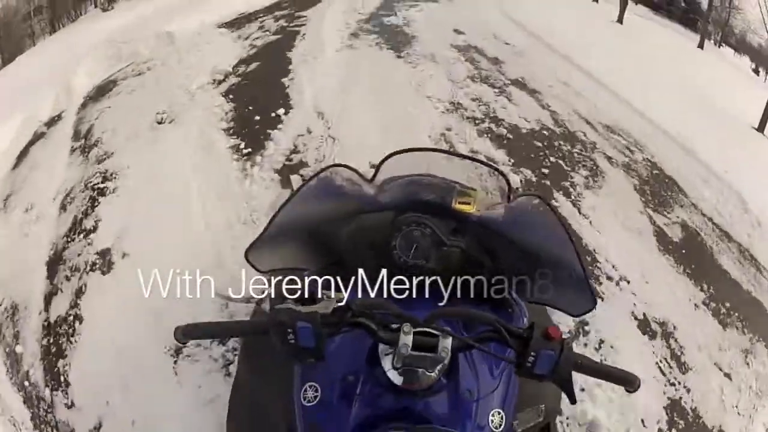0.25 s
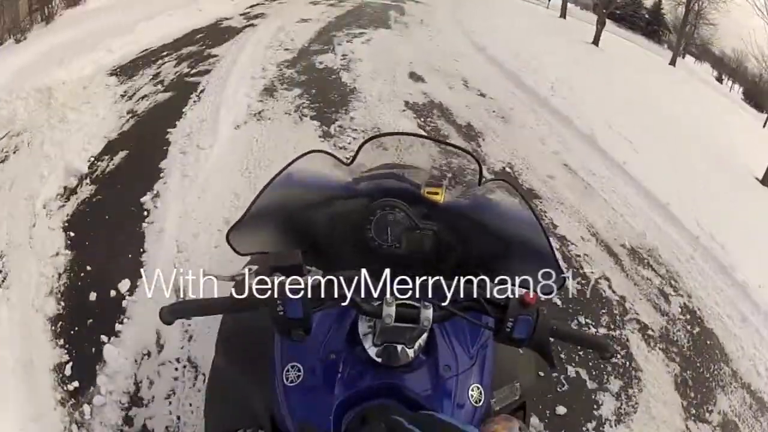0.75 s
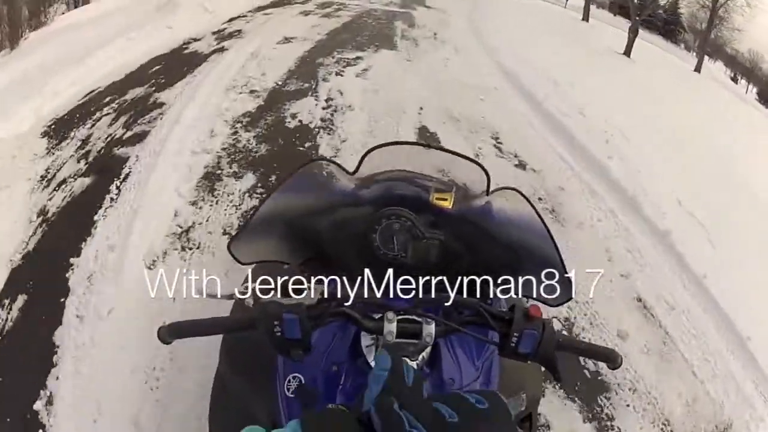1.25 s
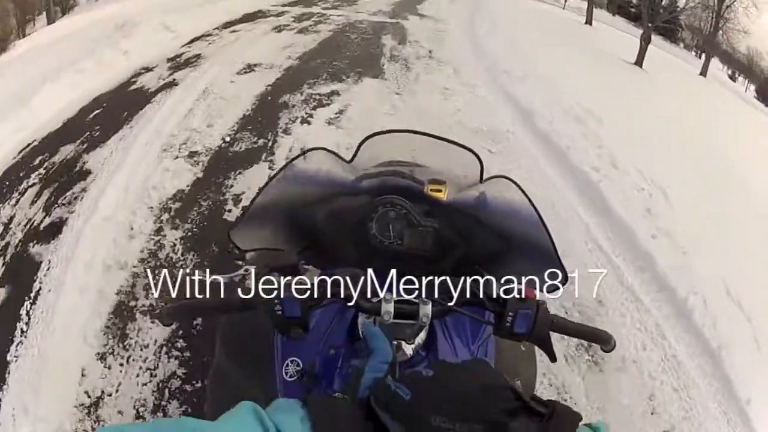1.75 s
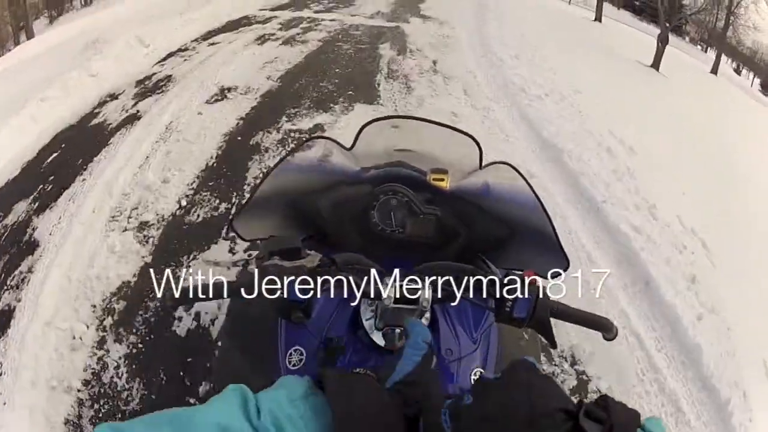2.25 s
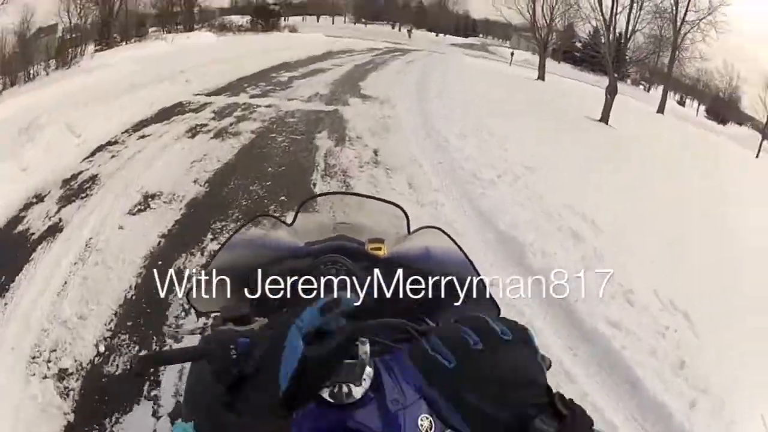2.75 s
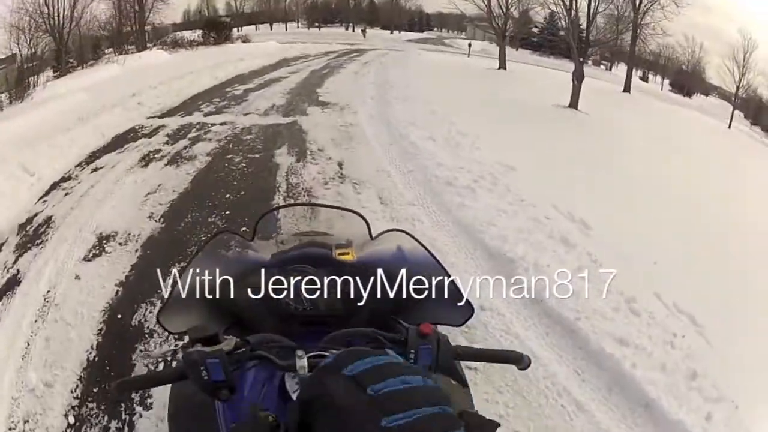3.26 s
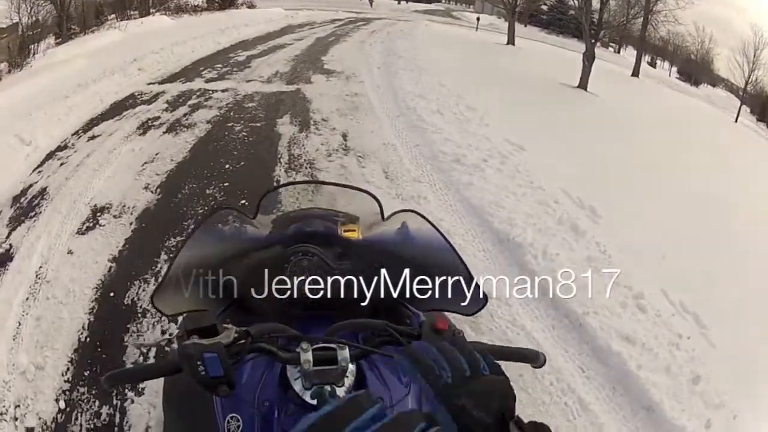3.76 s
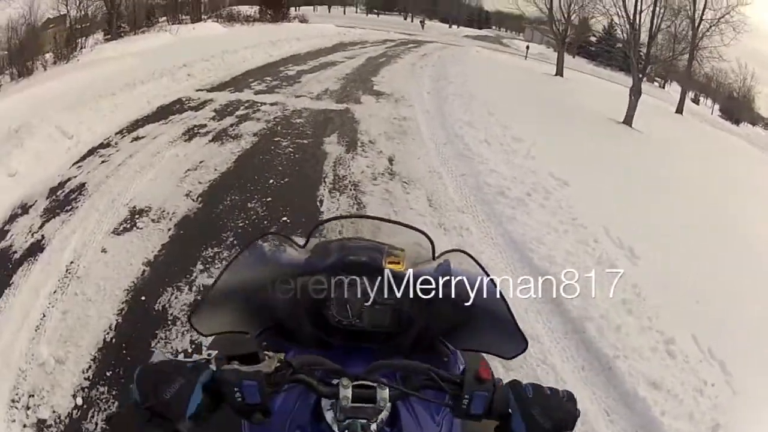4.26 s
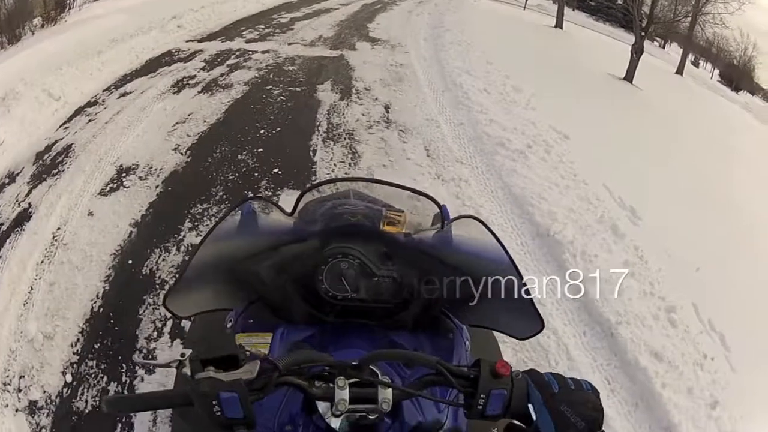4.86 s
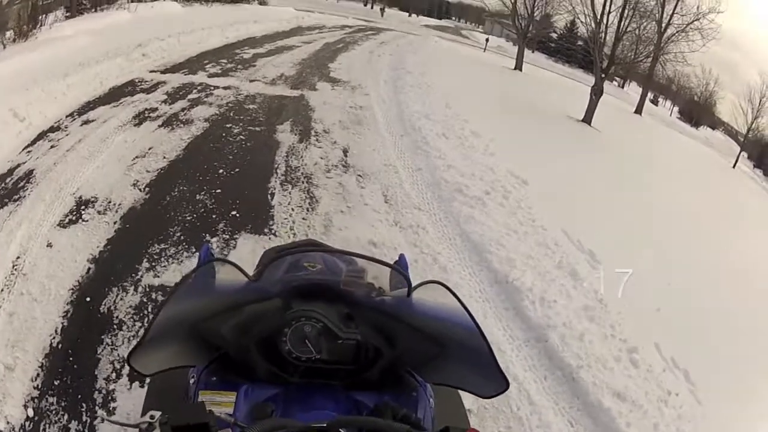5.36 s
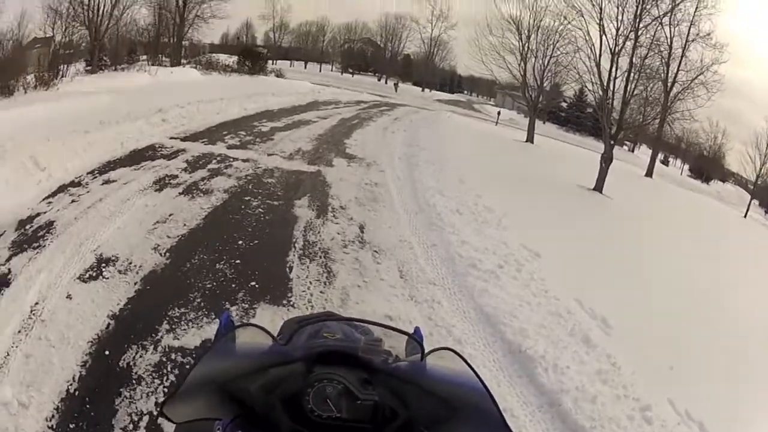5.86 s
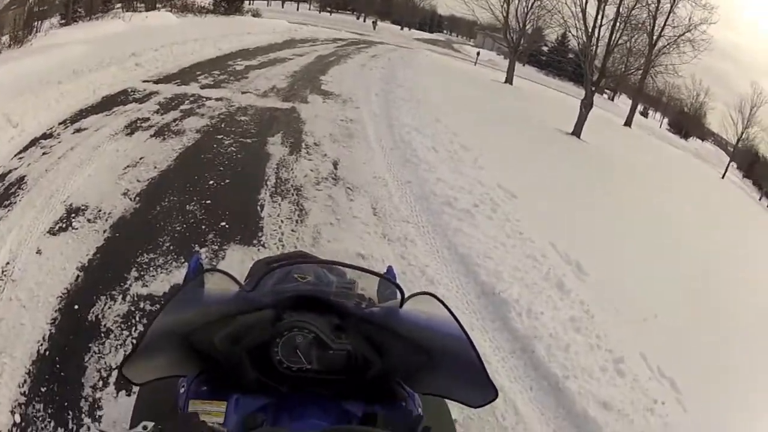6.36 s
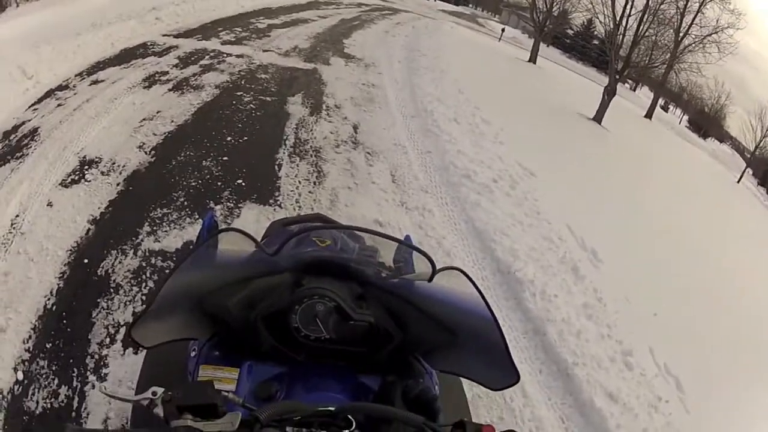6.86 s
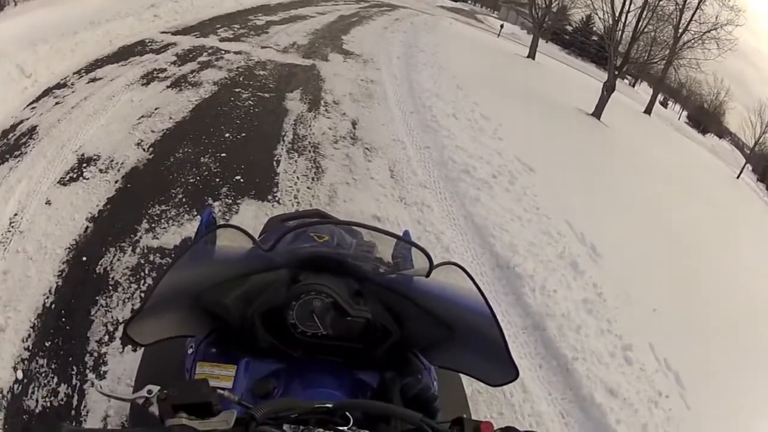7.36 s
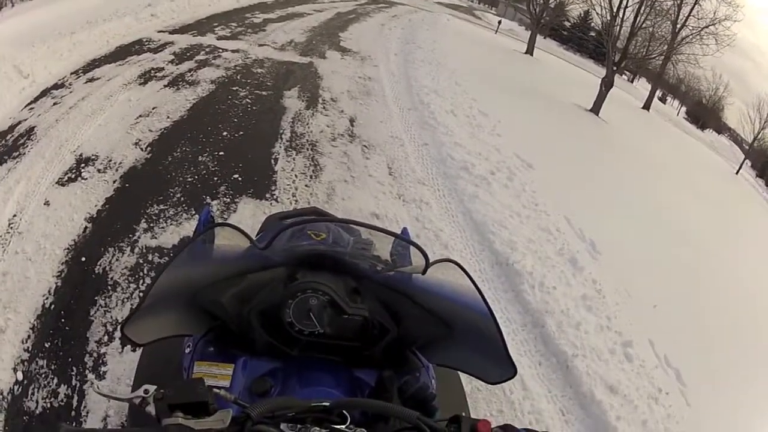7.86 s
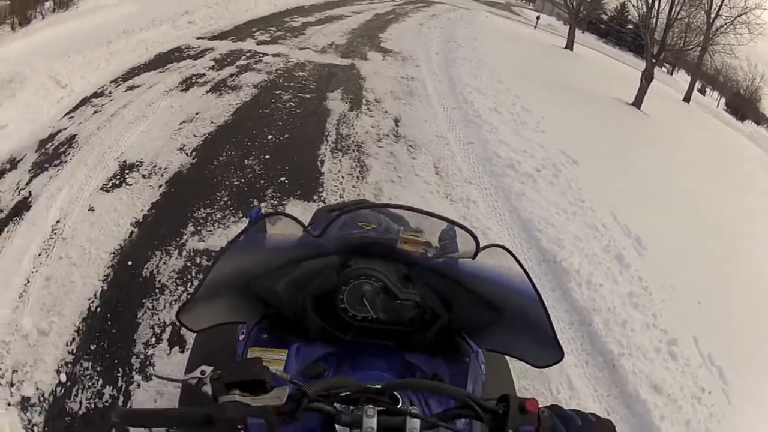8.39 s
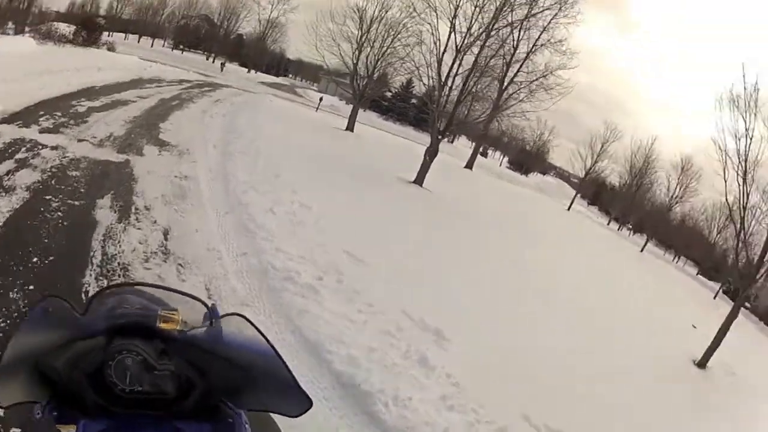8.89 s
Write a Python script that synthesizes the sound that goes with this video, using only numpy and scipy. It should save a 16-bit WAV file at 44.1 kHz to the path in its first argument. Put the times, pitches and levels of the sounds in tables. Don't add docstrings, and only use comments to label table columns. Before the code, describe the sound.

Muffled onboard snowmobile engine slows to a lumpy idle and dies; the starter whirs twice before the motor sputters alive and revs loudly.

```python
import sys
import numpy as np
from scipy import signal
from scipy.fft import rfft, irfft, next_fast_len
from scipy.io import wavfile
from scipy.ndimage import uniform_filter1d

SR = 44100
rng = np.random.default_rng(int(sys.argv[2]) if len(sys.argv) > 2 else 0)


def dump(signal):
    limited = np.clip(np.atleast_2d(signal).T, -1, 1)
    pcm = np.round(limited * 32767).astype(np.int16)
    wavfile.write(sys.argv[1], SR, pcm)


def amplitude_ratio(level_db):
    exponent = np.asarray(level_db, float) / 20
    return 10 ** exponent


N = 402633
TIME = np.arange(N) / SR
COAST_S, STALL_S, CATCH_S, FIRST_PULSE_S = 2.4, 4.0, 7.76, 7.6
FRAME_HZ = 72.05

# start_s, rate_hz
SPEED_HZ = [(0, 36), (1, 30), (1.5, 28.8), (2.5, 28.55), (2.8, 27.8), (4, 27.9), (7.55, 30), (7.72, 39),
            (7.76, 50.8), (7.83, 53.5), (7.885, 67.5), (8.07, 65.5), (8.11, 69), (8.165, 81.5),
            (8.27, 97.8), (8.37, 94.8), (8.55, 96.5), (9.13, 98)]
# start_s, pitch_surge_share [0-1], whistle_db
STARTS = [
    (5.2, 0.96, -5.5),
    (6.543, .7, -4),
]
# mode_hz, width_hz, level_db
COWL = [(928, 86, -9), (1170, 141, 0), (1347, 177, -2.5), (1639, 122, -5), (1907, 171, 0), (2256, 247, -8),
        (2696, 74, -8), (2850, 274, -11.5), (3200, 530, -19)]
# mode_hz, width_hz, level_db
PANELS = [(1210, 224, 2), (1940, 92, -16), (2830, 49, -26)]
# mode_hz, width_hz, level_db
SMALL_PARTS = [(1200, 83, -5), (1940, 40, -6), (2880, 59, -2)]
# mode_hz, width_hz, level_db
HOUSING = [(2830, 150, 4), (3160, 110, 5), (3460, 120, 7), (3720, 200, 4)]


def level(x):
    return x / np.sqrt(np.mean(x ** 2))


def curves(table, outside=None):
    s, *columns = np.transpose(table)
    return [np.interp(TIME, s, c, outside, outside) for c in columns]


def dip(s, half_s, db):
    return amplitude_ratio(db * np.exp(-((TIME - s) / half_s) ** 2))


def decay(t, t60_s):
    return np.exp(-np.log(1000) * t / t60_s)


def walk(rate_hz):
    k = int(SR / rate_hz)
    steps = np.repeat(rng.standard_normal(N // k + 1), k)
    return 1.288 * uniform_filter1d(uniform_filter1d(steps, k), k)[:N]


def add(out, s, x):
    i = int(s * SR)
    out[i:i + len(x)] += x[:N - i]


def ring(x, modes):
    out = 0
    for k, (hz, width_hz, db) in enumerate(modes):
        b, a = signal.iirpeak(hz, hz / (1.336 * width_hz), SR)
        out = out + (-1) ** k * amplitude_ratio(db) * signal.lfilter(b, a, signal.lfilter(b, a, x))
    return out


def coloured(spectrum, lo_hz, hi_hz):
    size = next_fast_len(N)
    hz = np.fft.rfftfreq(size, 1 / SR) + 1e-3
    f, db = np.transpose(spectrum)
    gain = amplitude_ratio(np.interp(np.log(hz), np.log(f), db))
    gain = gain / np.sqrt(np.sum(gain[(hz > lo_hz) & (hz < hi_hz)] ** 2) / len(hz))
    return irfft(rfft(rng.standard_normal(size)) * gain, size)[:N]


def glide(table, patchy_db, rate_hz):
    hz = curves(table)[0] * (1 + 0.00208 * patchy_db * walk(rate_hz))
    gain = amplitude_ratio(curves(table, -150)[1] + 2.0 + patchy_db * walk(rate_hz))
    return gain * np.sin(2 * np.pi * np.cumsum(hz) / SR)


def strokes(hz):
    regimes = [
        (-13, .2, 3.3),
        (-9, .81, 1.4),
        (-6, .7, 2),
        (-.9, .4, .9),
    ]
    pull_from_hz, pull_span_hz = 33, 27
    coast, idle, catch, pull = np.array(regimes)[:, :, None]
    settled = np.clip(TIME / COAST_S, 0, 1)
    pulling = np.clip((hz - pull_from_hz) / pull_span_hz, 0, 1)
    out = np.where(TIME < STALL_S, coast + (idle - coast) * settled, catch + (pull - catch) * pulling)
    silent = (TIME > STALL_S) & (TIME < FIRST_PULSE_S)
    return out[0] - 24 * uniform_filter1d(1. * silent, SR // 16), out[1], out[2]


def engine(rumble_db):
    # mode_hz, width_hz, level_db
    pipe_modes = [(104, 60, -2.5), (127.8, 6.4, 3.5), (223.4, 26, 1.5), (268.4, 74, 1), (348.4, 27, -0.5),
                  (403, 27.7, 1), (502, 32, -16), (590, 32, -7.5)]
    pattern = [0, -8, -3]
    # freq_hz, density_db
    rumble_spectrum = [(53, -20), (90, -3), (108, -13), (135, -1.5), (227, -3.5), (350, -4.5), (416, -17.5),
                       (583, -15.5), (681, -25.5), (900, -24.5), (1170, -38), (1980, -120)]
    # centre_s, half_s, depth_db
    low_dip = (8.19, 0.054, -12)
    middle_dip = (7.97, .08, -10)
    high_dip = (7.76, .04, -8)
    # mode_hz, width_hz, depth_db
    still_hollow = (296, 137, -3.5)
    # centre_s, half_s, depth_db
    weak_firings = [(1.235, .012, -3), (2.24, 0.012, -4), (2.275, 0.013, -8), (2.445, 0.011, -6),
                    (2.64, .02, -4), (2.866, 0.012, -4), (3.305, 0.0065, -3), (3.588, 0.011, -2)]
    # centre_s, half_s, depth_db
    misfires = [
        (8.033, 0.015, -8),
        (8.194, 0.017, -7),
    ]
    strong_firing_s, idle_lope, throb = 3.549, 1, 0.075
    tick_db, tick_scatter_db = -12, 1
    cowl_idle_db, cowl_pull_db = -2.5, -2

    coasting = TIME < STALL_S
    stopped = (TIME > STALL_S) & (TIME < FIRST_PULSE_S)
    hz, = curves(SPEED_HZ)
    pulse_db, depth, scatter_db = strokes(hz)
    turns = np.cumsum(hz * (1 + .004 * scatter_db * walk(40))) / SR
    turns = turns + -turns[int(strong_firing_s * SR)] % len(pattern)
    cycle = turns.astype(int)
    firing = np.diff(cycle, prepend=cycle[0])
    size_db = scatter_db * rng.standard_normal(N // 100)[cycle]
    steady = np.clip(1 - uniform_filter1d(np.abs(np.gradient(hz)), SR // 6) * SR / 40, .2, 1)
    pattern_db = steady * np.array(pattern)[cycle % len(pattern)]
    kicks = firing * amplitude_ratio(size_db + pattern_db) / np.sqrt(hz)

    share = np.clip(amplitude_ratio(pulse_db), 0, .99)
    high = ring(kicks, pipe_modes[5:6]) - dip(*middle_dip) * ring(kicks, pipe_modes[6:])
    pipe = dip(*low_dip) * ring(kicks, pipe_modes[:4])
    pipe = pipe + dip(*middle_dip) * ring(kicks, pipe_modes[4:5]) - dip(*high_dip) * high
    pipe = pipe / np.sqrt(uniform_filter1d(pipe ** 2, SR // 8))
    rumble = pipe * share + coloured(rumble_spectrum, 110, 630) * np.sqrt(1 - share ** 2)

    phase, depth = turns % 1, np.clip(depth, 0, 1)
    later = (phase + .5) % 1
    puff = 9.5 * phase * np.exp(-(phase / .19) ** 2) + 4.5 * later * np.exp(-later / .08)
    lope = np.where(coasting, idle_lope, 0.86)
    puff = 1 - depth + depth * amplitude_ratio(size_db + lope * pattern_db) * puff
    puff = puff / np.sqrt(uniform_filter1d(puff ** 2, SR // 4))

    running = amplitude_ratio(rumble_db) * (amplitude_ratio(cowl_idle_db) * coasting + amplitude_ratio(cowl_pull_db) * (TIME > CATCH_S))
    scatter = tick_scatter_db * rng.standard_normal((len(SMALL_PARTS), N // 100))
    strikes = firing * amplitude_ratio(scatter[:, cycle]) * coasting
    ticks = level(sum(ring(x, [mode]) for x, mode in zip(strikes, SMALL_PARTS)))
    rap = amplitude_ratio(-4.5) * level(ring(kicks, PANELS)) + amplitude_ratio(tick_db) * ticks
    rap = depth ** 2 * running * rap

    rumble = rumble * (1 + throb * (puff - 1) * coasting)
    rumble = rumble * amplitude_ratio(2.56 * walk(10) * stopped)
    hollow_hz, hollow_width_hz, hollow_db = still_hollow
    middle = ring(rumble, [(hollow_hz, hollow_width_hz, 0)])
    rumble = rumble - (1 - amplitude_ratio(hollow_db)) * stopped * middle
    for weak in weak_firings:
        puff, rap = puff * dip(*weak), rap * dip(*weak)
    for misfire in misfires:
        rumble = rumble * dip(*misfire)
    return amplitude_ratio(rumble_db) * rumble + rap, puff * running * amplitude_ratio(1.15 * walk(60)), kicks, share


def coughs():
    # start_s, peak_db,
    # length_s
    puff_rows = [(0.725, -49, 0.011), (1.54, -57, .012), (2.335, -41, 0.024), (2.51, -48, 0.017),
                 (2.722, -47, 0.028), (2.974, -46, 0.012), (3.265, -49, .012), (3.69, -59, 0.011),
                 (3.835, -56, .012), (3.87, -52, 0.017), (2.553, -46, 0.019), (2.765, -48, 0.028),
                 (3.91, -47.5, 0.041), (3.945, -50, 0.027), (3.978, -45, 0.011), (4.004, -41, 0.013),
                 (4.046, -39, 0.016), (4.077, -36.5, 0.022), (4.111, -36, 0.017), (4.144, -33.5, 0.014),
                 (4.186, -32.5, 0.012), (4.242, -30.5, 0.0084), (4.315, -34.5, 0.044), (4.82, -52, 0.14),
                 (4.95, -54, 0.066), (6.29, -53, 0.067), (8.1, -38, 0.047), (9.115, -50, .03),
                 (5.459, -35, 0.057), (5.545, -37, 0.022), (5.586, -34, 0.019), (5.614, -38, 0.033),
                  (5.652, -34.5, 0.015), (5.683, -36.5, 0.025), (5.7276, -34, 0.013), (5.778, -38, 0.025),
                  (5.841, -36, 0.027), (5.927, -34, 0.047), (6.088, -36.5, 0.031), (6.799, -38, 0.064),
                  (6.83, -61, 0.022), (6.898, -37.5, 0.022), (6.942, -33, 0.018), (6.974, -35, 0.022),
                  (7.012, -36.5, 0.022), (7.06, -31, 0.013), (7.103, -33.5, 0.018), (7.1635, -37.5, 0.021),
                  (7.241, -35, 0.042), (7.341, -32.5, 0.021), (7.421, -31.5, 0.035), (7.529, -32, 0.045),
                  (7.604, -35.5, 0.034), (7.68, -44.5, 0.034), (7.718, -37, 0.052)]
    lag_s, rise_s = .002, .0018
    upper_db, upper_db_per_s, upper_wait_s = -5, 158, 0.06
    out, t = np.zeros((2, N)), np.arange(SR // 5) / SR
    rows = sorted(puff_rows)
    waits_s = np.diff([0] + [r[0] for r in rows])
    for (s, db, length_s), wait_s in zip(rows, waits_s):
        body = np.exp(-(t / (1.063 * length_s)) ** 1.87) + 0.072 * np.exp(-t / 0.042)
        shape = amplitude_ratio(db - 12.0) * (1 - np.exp(-t / rise_s)) * body
        add(out[0], s + lag_s, shape)
        add(out[1], s + lag_s, shape * amplitude_ratio(upper_db + upper_db_per_s * min(wait_s, upper_wait_s)))
    return out * amplitude_ratio(1.16 * walk(150))


def cowl_noise(gate, lone, upper, grind):
    # mode_hz, width_hz, level_db
    loose_panel = [(2360, 51, -13), (3220, 89, -14)]
    pull_low_db, ring_db, fizz_db = -2.5, -9.5, -24.5
    noise = rng.standard_normal((2, N))
    unit = np.sqrt(np.mean(ring(noise[0], COWL) ** 2))
    breath = noise[0] * (gate + lone)
    out = amplitude_ratio(pull_low_db * (TIME > CATCH_S)) * ring(breath, COWL[:2]) + ring(breath, COWL[2:6])
    out = out + ring(noise[1] * (gate + upper + 1.4 * grind), COWL[6:])
    out = out + amplitude_ratio(-6) * ring(noise[1] * lone, PANELS[1:2])
    out = out + amplitude_ratio(-20) * ring(noise[0] * grind, HOUSING)
    out = out + amplitude_ratio(ring_db) * ring(noise[1] * lone, SMALL_PARTS)
    out = out + ring(noise[0] * (lone + 1.5 * grind), loose_panel)
    out = out + amplitude_ratio(fizz_db) * ring(noise[1] * (lone + 2.13 * grind), [(5240, 640, 0)])
    return out / unit


def rocking(effort_db):
    # peak_s, peak_db, rise_s, fall_s
    surges = [(.42, -48, 0.046, 0.1), (1.35, -59, 0.19, .15), (2.01, -60, 0.049, 0.11),
              (2.98, -54, 0.39, 0.049), (4.15, -52, 0.12, .1), (4.6, -59, .04, 0.024),
              (4.94, -50.5, 0.13, 0.079), (5.29, -64, 0.11, 0.03), (5.545, -47, 0.022, .025),
              (5.63, -42, 0.033, 0.054), (5.79, -58, 0.044, .04), (5.91, -58, 0.043, 0.05),
              (6.07, -62, .05, .04), (6.28, -57, 0.019, 0.034), (6.43, -63, 0.065, 0.08),
              (6.9, -44.5, 0.026, 0.018), (6.975, -42.5, 0.026, 0.038), (7.17, -49, 0.043, 0.042),
              (7.7, -41, 0.082, 0.11), (7.9, -54, 0.069, 0.031), (8.1, -47, 0.076, 0.073),
              (8.24, -40, 0.095, 0.051), (8.98, -58, .1, .04)]
    boom_db, boom_slope, fall_db_per_hz = -53.5, 0.63, .3
    over_hz = np.clip(curves(SPEED_HZ)[0] - FRAME_HZ, 0, None)
    out = amplitude_ratio(boom_db + boom_slope * (effort_db + 52.5) - fall_db_per_hz * over_hz)
    out = out * ((TIME < STALL_S) + 0.58 * (TIME > STALL_S))
    for s, db, rise_s, fall_s in surges:
        out = out + amplitude_ratio(db) * np.exp(-((TIME - s) / np.where(TIME < s, rise_s, fall_s)) ** 2)
    return out


def frame(kicks, share):
    # start_s, pitch_hz
    frame_pitch = [(0, 70.7), (1.5, 71), (3, 72.43), (4.3, 73), (4.85, 83.7), (5.0, 78.1), (5.55, 66),
                   (5.9, 76), (6.5, 77.7), (6.9, 65.8), (7.2, 78), (7.6, 70), (9.13, 72.1)]
    size = next_fast_len(N)
    loose = level(ring(rng.standard_normal(N), [(FRAME_HZ, 11.8, 0)]))
    shift = 2 * np.pi * np.cumsum(curves(frame_pitch)[0] - FRAME_HZ) / SR
    loose = np.real(signal.hilbert(loose, size)[:N] * np.exp(1j * shift))
    driven = level(ring(kicks, [(62.5, 17.5, 0)]))
    swing = np.sqrt(1 - share ** 2) * loose + 1.24 * share * driven
    swing = swing / np.sqrt(uniform_filter1d(swing ** 2, SR // 5))
    return level(swing / (np.abs(signal.hilbert(swing, size)[:N]) + 0.8))


def starter():
    # after_start_s, mesh_hz, level_db, grind_db
    spin = [(0, 560, -78, -64), (.04, 578, -70, -64), (.062, 600, -55, -65), (.095, 735, -59, -66),
            (.125, 735, -57, -64), (.145, 640, -50, -66), (.18, 597, -49, -64), (.198, 585, -62, -80),
            (.245, 585, -86, -85)]
    # multiple, level_db
    mesh = [(1, -12), (2, 0), (3, -6), (4, -11), (5, -22)]
    rest_hz = 594
    whine, grind = 0, 0
    for s, surge, _ in STARTS:
        table = [(s + d, rest_hz + surge ** .4 * (hz - rest_hz), *rest) for d, hz, *rest in spin]
        hz = curves(table)[0]
        _, db, noise_db = curves(table, -150)
        phase = 2 * np.pi * np.cumsum(hz * (1 + 0.008 * walk(220))) / SR
        for k, harmonic_db in mesh:
            waver_db = 2.3 * walk(90) + 1.5 * walk(500)
            whine = whine + amplitude_ratio(db + harmonic_db + waver_db) * np.sin(round(k) * phase)
        grind = grind + amplitude_ratio(noise_db)
    return whine, grind


def tones():
    # after_start_s, pitch_hz, level_db
    whistle_path = [(.04, 2780, -80), (.06, 2850, -56), (.108, 3620, -62), (.126, 3480, -59),
                    (0.151, 2830, -57), (.175, 2850, -52.5), (.19, 3200, -63), (.207, 3600, -63),
                    (.232, 3920, -74)]
    # start_s, pitch_hz, level_db
    freewheel = [(5.85, 3700, -78), (5.87, 3650, -68), (5.91, 3480, -66), (5.935, 3250, -70),
                 (5.95, 3200, -78)]
    # after_start_s, pitch_hz, level_db
    release_path = [(.2, 1850, -80), (.225, 1950, -69), (.25, 2150, -67), (.27, 2200, -80)]
    # start_s, pitch_hz, level_db
    track = [(.58, 227, -68), (.7, 216.4, -52.5), (1.03, 194, -49.5), (1.33, 167.3, -47),
             (1.57, 144, -53.5), (1.81, 120, -59), (1.92, 106, -68)]
    rest_hz, surge_end_s = 2830, .16
    spins = []
    for s, surge, gain_db in STARTS:
        spins.append([(s + d, rest_hz + (surge if d < surge_end_s else 1) * (hz - rest_hz), db + gain_db)
                      for d, hz, db in whistle_path])
    whistle = sum(glide(t, 3.5, 200) for t in spins + [freewheel])
    releases = [[(s + d, hz, db) for d, hz, db in release_path] for s, _, _ in STARTS]
    release = sum(glide(t, 2.5, 120) for t in releases)
    return glide(track, .3, 15) + release + .4 * whistle + .6 * ring(whistle, HOUSING)


def knocks():
    # start_s, peak_db, t60_s, low_db, high_db
    knock_rows = [(1.3194, -35, 0.031, -18, -39), (1.6372, -37.5, 0.035, -16, -36),
                  (1.718, -40.5, 0.09, -13, -37), (2.5513, -44, 0.037, -26, -38),
                  (2.6777, -46, 0.056, -12, -42), (2.766, -37, 0.035, -26, -41),
                  (3.515, -41.5, 0.18, -18, -36), (4.8836, -54, 0.025, -2, 1.5),
                  (4.9392, -36, 0.04, -11, -27), (4.965, -53, 0.036, -4, -28), (5.053, -61, 0.045, -29, -4),
                  (5.0649, -43.5, 0.023, -4, -15), (6.2767, -38.5, 0.032, -6, -21),
                  (6.331, -45, 0.033, -8, -26), (6.35, -58, 0.027, -20, -3)]
    out, t = np.zeros((3, N)), np.arange(SR // 8) / SR
    bursts = rng.standard_normal((len(knock_rows), len(t)))
    for (s, db, t60_s, low_db, high_db), noise in zip(knock_rows, bursts):
        burst = (0.81 * noise + 2.1 * (t == 0)) * decay(t, t60_s)
        for row, extra_db in zip(out, (0, low_db, high_db)):
            add(row, s, amplitude_ratio(db + extra_db) * burst)
    body = 2.7 * ring(out[0], COWL) + 4.4 * ring(out[0], PANELS)
    thud = 6 * ring(out[1], [(550, 330, -0.5), (930, 230, 0), (2850, 590, -1.8)])
    return body + thud + 4 * ring(out[2], [(5500, 530, 2.5), (4700, 2000, -2)])


def pings():
    # start_s, peak_db, pitch_hz, t60_s
    ping_rows = [(1.319, -31, 1370, 0.026), (1.319, -40, 1630, 0.036), (1.72, -46.5, 1930, 0.13),
                 (2.342, -46, 1940, 0.081), (2.552, -43.5, 1940, 0.067), (2.677, -42.5, 590, 0.064),
                 (2.677, -48, 1127, .06), (2.677, -42, 1896, 0.05), (2.763, -37.5, 1940, 0.05),
                 (3.948, -42, 1940, .09), (4.117, -42, 1904, 0.086), (4.82, -56, 3080, .04),
                 (4.884, -52, 3100, .035), (4.884, -58, 4700, .03), (4.89, -62, 5450, .03),
                 (4.884, -51, 2250, .06), (4.889, -49, 1200, .06), (4.9397, -39, 1236, 0.038),
                 (4.9397, -43, 2900, .03), (4.946, -49, 1810, 0.056), (4.965, -56, 1200, 0.045),
                 (5.052, -48, 5330, .035), (5.052, -57, 4950, .06), (5.056, -41.5, 2170, 0.043),
                 (5.054, -54, 2780, 0.064), (5.054, -56, 3760, 0.038), (5.064, -42, 1210, 0.033),
                 (5.064, -50, 5370, 0.031), (5.065, -60, 4940, 0.05), (5.068, -44, 1940, 0.032),
                 (5.077, -64, 2100, .05), (1.638, -47, 2330, 0.048), (6.277, -43, 1260, 0.042),
                 (6.277, -46, 3000, 0.034), (6.35, -56, 2930, .04)]
    rise_s = 0.00081
    out, t = np.zeros(N), np.arange(SR // 6) / SR
    for s, db, hz, t60_s in ping_rows:
        swell = amplitude_ratio(db + 1.5) * (1 - np.exp(-t / rise_s)) * decay(t, t60_s)
        add(out, s, swell * np.sin(2 * np.pi * hz * t))
    return out * amplitude_ratio(1.6 * walk(250))


def bumps():
    # start_s, peak_db, pitch_hz, t60_s
    bump_rows = [(4.081, -61, 168, 0.13), (5.328, -57, 148, 0.1), (6.108, -46.5, 148, 0.1),
                 (6.115, -57, 225, .08), (7.259, -49, 145, 0.15), (7.439, -54, 197, .1),
                 (7.529, -57, 138, 0.19), (7.672, -49, 152, 0.12), (8.269, -43, 162, 0.22)]
    out, t = np.zeros(N), np.arange(SR // 4) / SR
    for s, db, hz, t60_s in bump_rows:
        swell = amplitude_ratio(db + 9.5) * (1 - np.exp(-t / 0.0095)) * decay(t, t60_s)
        add(out, s, swell * np.sin(2 * np.pi * hz * t))
    return out


def air():
    # start_s, level_db
    wind_db = [(0.0, -57), (1.86, -58), (1.98, -53), (2.8, -62), (3.25, -57), (4.15, -55), (4.32, -66),
               (4.7, -63), (5.1, -66), (5.44, -66), (5.59, -56), (6.41, -73), (7.02, -54), (7.32, -62),
               (7.63, -65), (9.13, -71)]
    # start_s, level_db
    slide_db = [(0, -42.5), (.5, -47.5), (1, -57.5), (2, -63), (2.6, -65.5)]
    # mode_hz, width_hz, level_db
    skis = [(313.7, 14, 8.5), (365, 10.7, 8), (468, 58, 3.5), (772, 21, 1), (882, 110, -1.5),
            (1160, 35, 3.5), (1260, 42, 3.5), (1337, 32, 5.5), (2707, 35, 0.5), (2870, 30, 1),
            (3350, 51, -16), (3893, 27, -6), (4040, 35, -13)]
    # start_s, level_db
    intake_db = [(7.8, -55), (8.3, -63), (8.7, -72), (8.9, -46.5), (9.13, -48.5)]
    # start_s, level_db
    rattle_db = [(0, -63), (.8, -59.5), (1.3, -59), (2.1, -65), (2.7, -76)]
    # start_s, level_db
    brush_db = [(4.77, -88), (4.82, -69), (4.92, -67), (5.0, -70), (5.05, -86)]
    # freq_hz, density_db
    quiet = [(290, -18), (500, -4.5), (855, -13), (1200, -22), (1560, -9), (1860, -3.5), (2580, -14),
             (4420, -19), (5900, -23), (7670, -73), (13000, -120)]
    quiet_db = -79
    noise = rng.standard_normal((3, N))
    wind = amplitude_ratio(curves(wind_db)[0]) * level(ring(noise[0], [(27.6, 47, 0)]))
    scrape = 0
    for mode in skis:
        fade_db = 6.0 * TIME * (mode[0] > 2500)
        scrape = scrape + amplitude_ratio(2.5 * walk(14.2) - fade_db) * ring(noise[1], [mode])
    slide = amplitude_ratio(curves(slide_db, -150)[0] + 2 * walk(16.0)) * level(scrape)
    howl = level(ring(noise[2], [(1670, 400, 0), (5120, 940, -24)]))
    intake = amplitude_ratio(curves(intake_db, -150)[0] + 2 * walk(30)) * howl
    rails = level(ring(noise[2], [(471, 93, 4), (780, 98, -11.0)]))
    rattle = amplitude_ratio(curves(rattle_db, -150)[0] + 2.1 * walk(25.06)) * rails
    glove = level(ring(noise[0], [(3500, 1000, 0), (4010, 190, 0)]))
    brush = amplitude_ratio(curves(brush_db, -150)[0]) * glove
    still = amplitude_ratio(quiet_db + 1.1 * walk(9)) * coloured(quiet, 4030, 6100)
    return brush + wind + slide + rattle + intake + still


def scene():
    # start_s, level_db
    effort = [(0, -43.5), (.94, -48), (2.3, -53), (4.15, -54.5), (4.5, -63), (5.39, -65.5), (5.62, -55),
              (6.2, -63), (6.79, -64), (6.93, -55), (7.4, -60), (7.72, -52.5), (7.8, -42), (8.0, -44),
              (8.035, -45.5), (8.08, -43.5), (8.26, -40.5), (9.13, -41.5)]
    # freq_hz, density_db
    hiss_spectrum = [(1940, -10), (3300, -2), (4000, -6.5), (4310, -14), (5430, -15.5), (5900, -57),
                     (7670, -59), (13000, -120)]
    cowl_still_db = -5.5
    hiss_start_db, hiss_fall_db_per_s, hiss_effort_db, hiss_puff_db = -57.5, 10.5, -23.5, -20.5
    rumble_db, = curves(effort)
    exhaust, puffs, kicks, share = engine(rumble_db)
    lone, upper = coughs()
    whine, grind = starter()
    still = (TIME > STALL_S) * (TIME < CATCH_S)
    gate = puffs + amplitude_ratio(rumble_db + cowl_still_db) * still + grind
    cowl = cowl_noise(gate, lone, upper, grind)
    spill = amplitude_ratio(-14.0) * (gate + lone) * coloured(
        [(400, -2.0), (700, 1.0), (3500, -7.0), (4400, -15.5), (5300, -9.5), (5800, -14.5), (6200, -64)],
        320, 6000)
    whine = (.7 * whine + 1.1 * ring(whine, [(710, 140, 0)]) + 0.72 * ring(whine, COWL[:3])
             + 0.4 * ring(whine, COWL[5:6]))
    snow = amplitude_ratio(hiss_start_db - hiss_fall_db_per_s * TIME) + amplitude_ratio(rumble_db + hiss_effort_db)
    snow = snow + amplitude_ratio(hiss_puff_db) * (upper + 3 * grind)
    hiss = amplitude_ratio(-3.0) * snow * coloured(hiss_spectrum, 3570, 5500)
    boom = rocking(rumble_db) * frame(kicks, share)
    mono = exhaust + boom + cowl + spill + hiss + whine + tones() + knocks() + pings() + bumps() + air()
    return np.array([mono, mono])


def roll_off(x):
    return signal.sosfilt(signal.butter(12, 15730, fs=SR, output="sos"), x)


def record(dry):
    slow = signal.resample_poly(dry[0], 40, 147)
    held = signal.resample_poly(np.repeat(slow, 4), 147, 160)[:N]
    held = signal.sosfilt(signal.ellip(8, .2, 70, 15330, fs=SR, output="sos"), held)
    hum = level(ring(rng.standard_normal(N), [(4350, 4600, 0.5), (556, 690, 9)]))
    side = amplitude_ratio(-37) * held * walk(40) + amplitude_ratio(-85.0) * hum
    return roll_off(np.array([held + side, held - side]))


dry = scene()
out = record(dry)
dump(out)
```